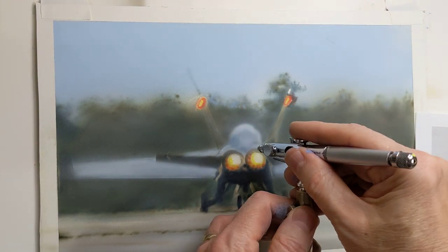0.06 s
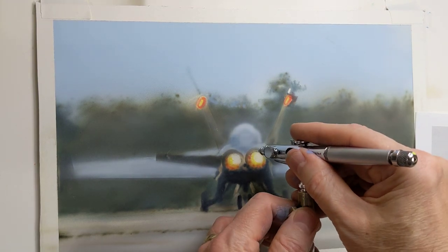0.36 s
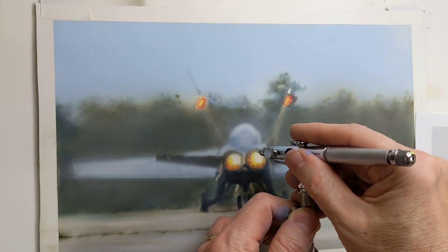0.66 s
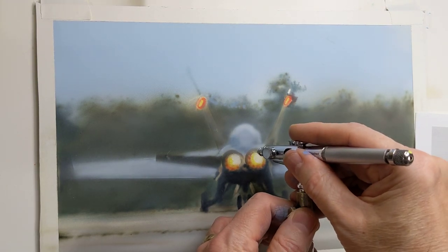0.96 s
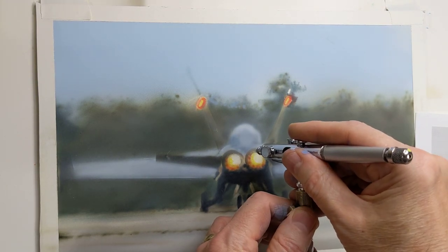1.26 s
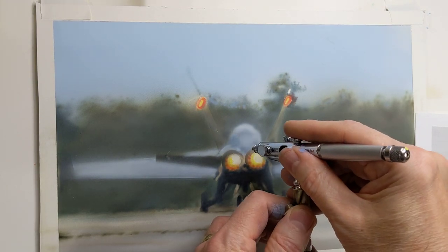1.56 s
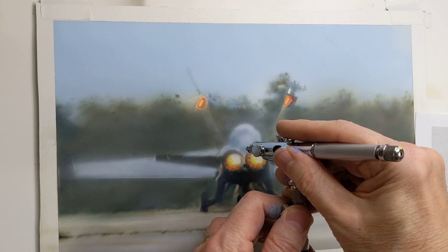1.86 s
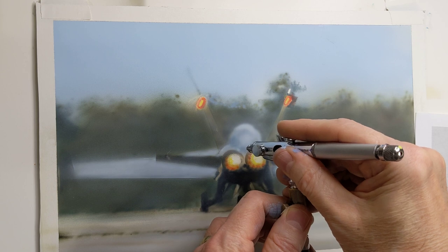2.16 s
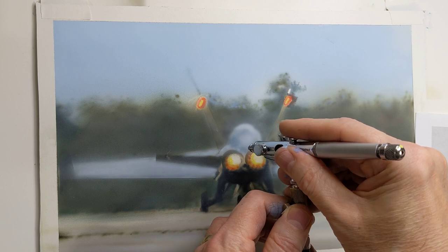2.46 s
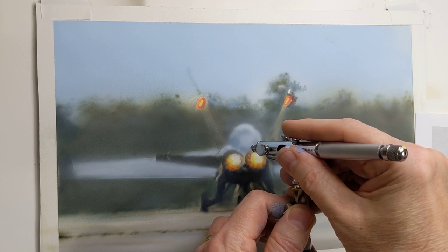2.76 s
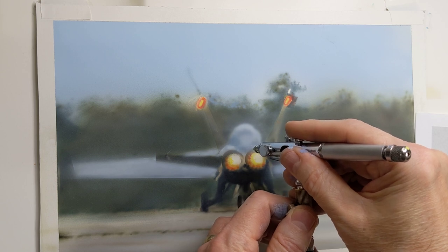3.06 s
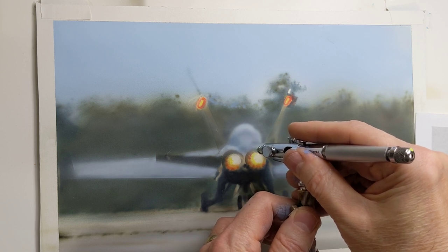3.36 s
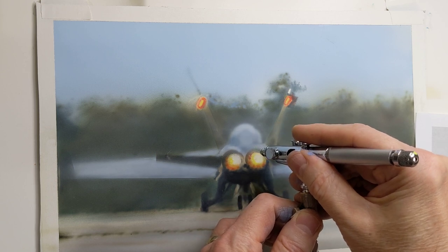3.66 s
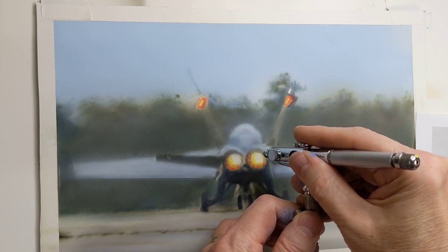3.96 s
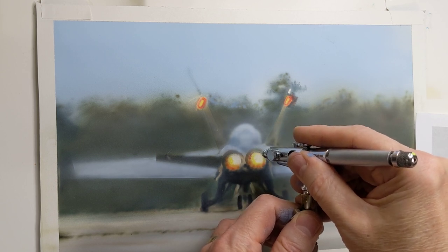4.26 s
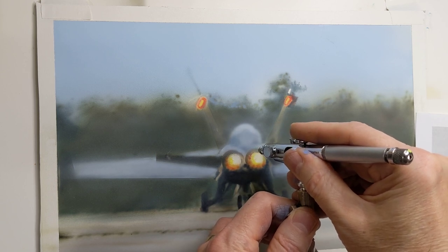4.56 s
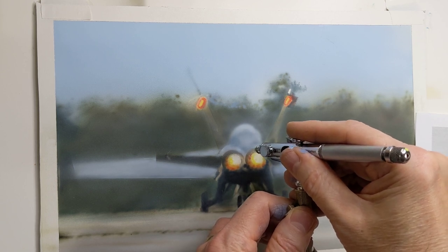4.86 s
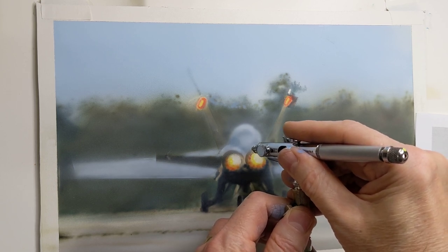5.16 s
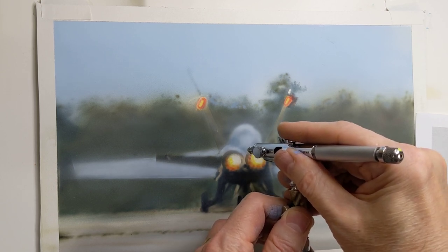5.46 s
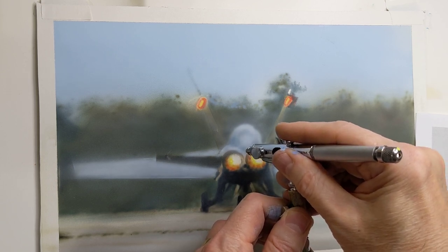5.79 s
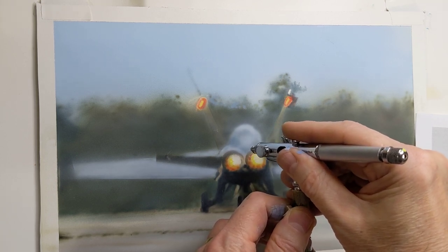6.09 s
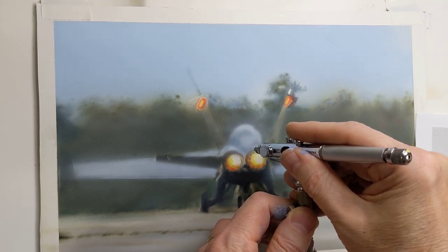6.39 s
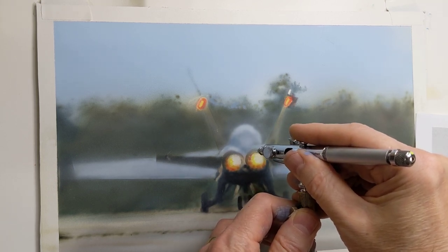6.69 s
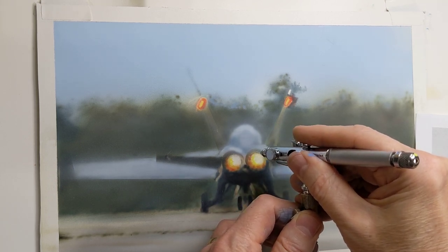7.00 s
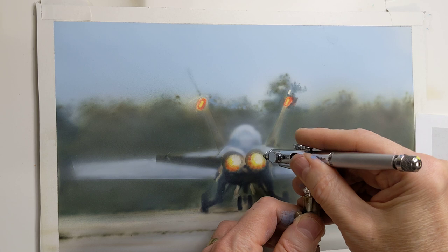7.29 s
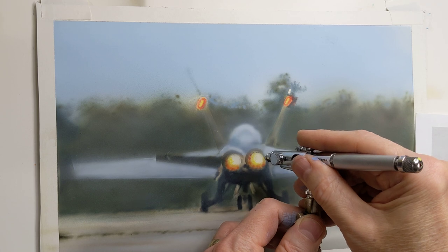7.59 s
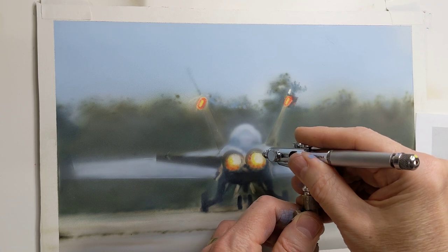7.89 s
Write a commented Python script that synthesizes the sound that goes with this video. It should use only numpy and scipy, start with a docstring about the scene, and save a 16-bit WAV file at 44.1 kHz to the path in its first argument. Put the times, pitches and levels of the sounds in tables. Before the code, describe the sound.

An airbrush sprays with a steady, fine, high hiss while a faint compressor rumble dies away halfway through.

```python
"""An airbrush blows a steady, fine jet of air at a painting, close to a small stereo microphone in a
quiet studio. At first its hiss fills out quickly, while a muffled rumble, probably the air compressor,
starts louder and settles. All along, a hand sweeps the nozzle slowly from side to side, so the hiss
shifts between the microphone's two openings (its ports) and turns brighter and duller.
Halfway through, the compressor winds down; the hiss then thins a little and carries on to the end."""
import sys
import numpy as np
from scipy.fft import rfft, irfft
from scipy.io import wavfile
from scipy.ndimage import map_coordinates

SR = 44100
rng = np.random.default_rng(int(sys.argv[2]) if len(sys.argv) > 2 else 0)


def to_wav(sig):
    """Store sig (one row per channel, or 1-D mono) as 16-bit WAV at the path in sys.argv[1].

    Samples outside -1..1 are clipped; the rate is SR.
    """
    pcm = np.clip(np.atleast_2d(sig), -1, 1) * 32767
    pcm = np.round(pcm).astype(np.int16)
    wavfile.write(sys.argv[1], SR, pcm.T)  # frames by channels


N = 354563


def airbrush(centre_lag_us=1.9, swing_lag_us=6.1, shade_db_per_us=0.0451, left_db=-1.01, right_db=-1.1):
    """The hiss of the moving nozzle, coloured differently at each port of the microphone."""
    # Peaks and dips made by the microphone's casing. Each row: centre in Hz, width in Hz, gain in dB.
    left_casing = [(1050, 180, -1.5), (1700, 1030, 4.4), (2740, 240, 1.3), (3380, 190, -1.4),
                   (4750, 450, -.9), (5630, 130, 2.1), (6160, 360, -2.9), (6580, 510, 3.9),
                   (8270, 190, 2.5), (8930, 590, -2.7), (9870, 270, -3.9), (11740, 670, 3.4),
                   (14000, 560, 1.5), (15160, 1470, -1.6)]
    right_casing = [(1230, 130, 2.2), (1470, 210, 2.5), (1770, 200, -3.8), (2280, 2470, 7.2),
                    (2550, 310, -5.5), (2830, 210, 4.8), (3600, 350, -5.8), (4230, 180, 3.6),
                    (5800, 200, -2.6), (6310, 1400, -7), (7020, 420, 3), (7700, 550, -6), (10020, 340, 8.2),
                    (10470, 5000, 3.9), (11870, 270, 5.2), (13850, 230, 3.1), (15280, 1990, 2.4)]
    # Echoes from nearby surfaces. Each row: delay in milliseconds, gain in dB.
    left_echoes = [(1.048, -28.0), (2.018, -18.2), (2.1, -22.0), (2.227, -29.7), (2.429, -27.6),
                   (2.608, -27.2)]
    right_echoes = [(0.879, -25.6), (1.009, -23.7), (1.328, -24.9), (1.552, -22.9), (1.642, -23.0),
                    (2.222, -20.0)]
    # Bands that change as the nozzle goes right.
    # Each row: centre in Hz, width in Hz, change in dB per unit of position.
    left_bands = [(1400, 1100, -1.4), (4450, 1300, 1.2)]
    right_bands = [(1400, 1200, -1.5), (4300, 900, 1.7), (6400, 760, .8), (11050, 400, 1.3),
                   (12200, 700, .6), (15100, 600, .7)]
    position = hand_sweep()
    lag_us = centre_lag_us + swing_lag_us * position  # extra delay at the left port, in microseconds
    left, right = hiss_at_ports(lag_us)
    left = shape(left, port_colour(left_casing, left_echoes)) * undb(left_db)
    shade_db = shade_db_per_us * lag_us  # the casing shades the right port as the nozzle goes left
    right = shape(right, port_colour(right_casing, right_echoes)) * undb(right_db + shade_db)
    return np.array([swells(left, left_bands, position), swells(right, right_bands, position)])


def jet(body_hz=5750, waver_db=1.1, waver_hz=25):
    """Tiny swirls of air at the nozzle hiss evenly; larger ones at the painting add a wavering body."""
    # The hiss of the swirling air. Each row: frequency in Hz, base level in dB per Hz.
    spectrum = [(300, -125), (600, -110), (930, -104), (1100, -89.5), (1400, -90), (1800, -91),
                (2500, -78.5), (3500, -74), (5000, -76), (7200, -65), (10800, -73), (12000, -67),
                (15700, -64)]
    body_share = 1 / (1 + (bins() / body_hz) ** 6)  # the body is the lower part of the hiss
    fine = shape(noise(), np.sqrt(1 - body_share))
    body = shape(noise(), np.sqrt(body_share)) * undb(body_level_db() + waver_db * wander(waver_hz))
    return shape(fine + body, undb(curve(spectrum)))


def body_level_db(running_db=0.23, rise_db=2.5, rise_s=0.099, sag_db=1.0, sag_s=0.54):
    """The body of the hiss builds up at the start and sinks a little once the compressor stops."""
    sag = sag_db * (1 - np.exp(-since_motor_stop() / sag_s))
    still_to_rise = rise_db * np.exp(-times() / rise_s)
    return running_db - sag - still_to_rise


def hand_sweep():
    """The nozzle's position: the hand moves it at an even speed from each point to the next."""
    # The hand's path. Each row: time in seconds, position (below 0 is left, above 0 is right).
    path = [(0, -0.71), (.6, 1), (1.35, 1.54), (1.95, -2), (2.7, -1), (3.6, 0.2), (4.0, 1.1), (4.45, 1.06),
            (5.8, -1.8), (7.55, 1.55), (8.04, .7)]
    return np.interp(times(), *np.transpose(path))


def hiss_at_ports(lag_us):
    """Part of the hiss is shared by both ports; the rest differs between them, making it sound wide."""
    # The way round the casing. Each row: frequency in Hz, phase in radians (below 0, the left port lags).
    casing_phase = [(0, 0), (700, -.7), (930, -2.6), (1050, -1.65), (1250, -1.85), (1510, -1.15),
                    (1770, -2.7), (2100, -3), (2350, -1.8), (2670, -2.9), (2930, -1.7), (3080, -2.6),
                    (3280, -1.7), (3680, -3.1), (4000, -3.4), (4350, -3.25), (4500, -3.6), (4740, -3.3),
                    (4930, -3.4), (5100, -3.3), (5510, -4.35), (6030, -4.4), (6550, -6.55), (7320, -6.25),
                    (8480, -8.4), (8870, -7.65), (9720, -8.9), (9950, -8.05), (10300, -7.9), (11500, -9.4),
                    (11710, -8.95), (12100, -9.8), (12280, -9.3), (12490, -10.5), (12750, -9.7),
                    (13520, -11.85), (13650, -11.15), (14560, -12.6), (15720, -12.4)]
    # How much of the hiss differs between the two ports. Each row: frequency in Hz, share from 0 to 1.
    unlike_share = [(500, .1), (950, 0.02), (1400, 0.3), (1800, 0.07), (2000, 0.22), (2280, 0.68),
                    (2420, 0.41), (3050, 0.24), (3200, 0.5), (3520, 0.39), (3700, 0.03), (3950, 0),
                    (4220, 0.3), (4350, 0.01), (4600, 0.49), (4760, 0), (5100, 0), (5280, 0.52), (5900, .3),
                    (6290, 0.43), (6800, 0.13), (8600, 0.3), (10600, 0.27), (11900, 0.11), (12900, 0.06),
                    (13500, .25), (13900, 0.1), (15700, 0.2)]
    right = jet()
    left = delay(right, lag_us / 1e6)
    phase = np.interp(bins(), *np.transpose(casing_phase))
    left = shape(left, np.exp(1j * phase))
    unlike = curve(unlike_share)
    shared = shape(np.array([left, right]), np.sqrt(1 - unlike))
    separate = shape(np.array([jet(), jet()]), np.sqrt(unlike))
    return shared + separate


def port_colour(casing, echoes):
    """One port's gain at each frequency: the casing's peaks and dips, rippled by short echoes."""
    casing_db = sum(db * bell(hz, width) for hz, width, db in casing)
    ripple = 1 + sum(undb(db) * np.exp(-2j * np.pi * bins() * ms / 1000) for ms, db in echoes)
    return undb(casing_db) * ripple


def swells(hiss, bands, position):
    """Bands of the hiss grow and fade with the position of the nozzle."""
    return hiss + sum(shape(hiss, bell(hz, width)) * (undb(db * position) - 1) for hz, width, db in bands)


def compressor(running_db=0.04, surge_db=5, surge_s=0.22, fade_db_per_s=27, waver_db=0.5, waver_hz=8):
    """A dull, slightly wavering rumble that settles, runs on and dies away when the motor stops."""
    # The motor's rumble. Each row: frequency in Hz, base level in dB per Hz.
    spectrum = [(20, -117), (40, -104), (70, -96), (130, -90.5), (170, -92), (205, -90), (265, -95),
                (350, -96), (480, -93), (760, -95.5), (930, -96), (1500, -86.5), (2300, -96.5),
                (4000, -105)]
    surge = surge_db * np.exp(-times() / surge_s)
    level_db = running_db + surge - fade_db_per_s * since_motor_stop()
    return far_noise(spectrum, likeness=0.43) * undb(level_db + waver_db * wander(waver_hz))


def since_motor_stop(stop_s=3.94):
    """Seconds since the compressor stopped; zero while it runs."""
    return np.maximum(times() - stop_s, 0)


def studio():
    """The faint, steady noise of the quiet room."""
    # The room's own sound. Each row: frequency in Hz, level in dB per Hz.
    spectrum = [(15, -112), (40, -107.5), (70, -99.5), (130, -99.5), (170, -101), (235, -99.5), (350, -112),
                (470, -103), (650, -106.5), (1500, -110), (8000, -120)]
    return far_noise(spectrum, likeness=0.6)


def far_noise(spectrum, likeness, apart_hz=1300):
    """Noise from all round the room: partly alike at both ports in the bass, unrelated higher up."""
    alike = likeness / (1 + (bins() / apart_hz) ** 4)
    shared = shape(noise(), np.sqrt(alike))
    separate = shape(np.array([noise(), noise()]), np.sqrt(1 - alike))
    return shape(shared + separate, undb(curve(spectrum)))


def noise():
    """White noise, equally strong at all frequencies: 0 dB per Hz."""
    return rng.standard_normal(N) * np.sqrt(SR / 2)


def wander(rate_hz):
    """A random drift, typically of size 1, that changes about rate_hz times a second."""
    slow = shape(noise(), 1 / (1 + (bins() / rate_hz) ** 2))
    return slow / np.std(slow)


def delay(sound, seconds):
    """Delay a sound by a changing amount, sampling it four times as finely to keep the treble."""
    fine = irfft(rfft(sound), 4 * N) * 4
    read_at = 4 * (np.arange(N) - seconds * SR)
    return map_coordinates(fine, [read_at], order=3, mode="nearest")


def shape(sound, gains):
    """Filter a sound by giving each frequency its own gain."""
    return irfft(rfft(sound) * gains, N)


def curve(points):
    """Join (Hz, value) points with straight lines, on a scale where every octave is equally wide."""
    hz, value = np.transpose(points)
    return np.interp(np.log(bins() + 1), np.log(hz), value)


def bell(hz, width):
    """A bell-shaped band of frequencies, 1 at its centre."""
    return np.exp(-(2 * (bins() - hz) / width) ** 2)


def undb(db):
    """Turn decibels into a number to multiply by."""
    return 10 ** (np.asarray(db) / 20)


def bins():
    """The frequencies that make up the sound, in Hz."""
    return np.arange(N // 2 + 1) * SR / N


def times():
    """The time of each sample in seconds."""
    return np.arange(N) / SR


def scene():
    """The airbrush in front, the compressor and the still room behind."""
    return airbrush() + compressor() + studio()


def record(dry, top_hz=15760):
    """Cut the highest treble steeply above top_hz."""
    steep_rise = np.minimum(bins() / top_hz, 1.02) ** 700  # the cap keeps this from overflowing
    return shape(dry, 1 / np.hypot(1, steep_rise))


dry = scene()
out = record(dry)
to_wav(out)
```